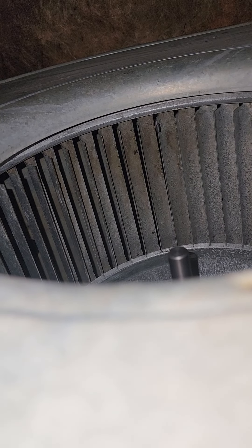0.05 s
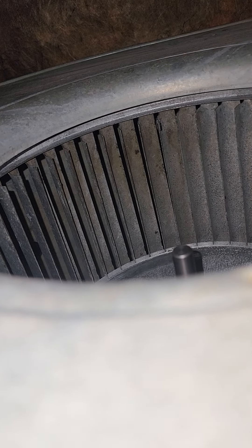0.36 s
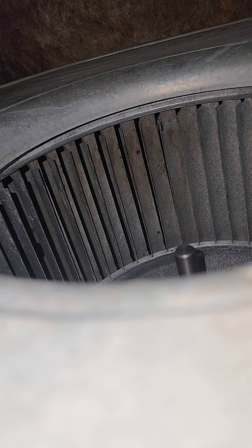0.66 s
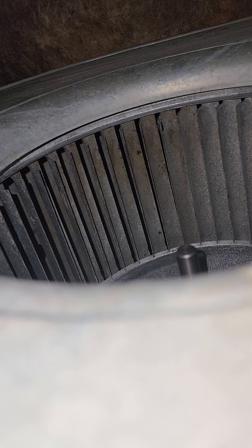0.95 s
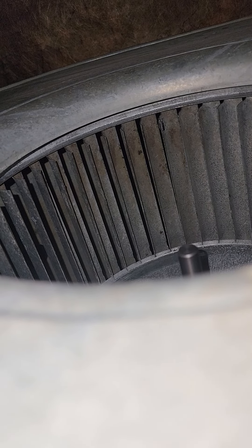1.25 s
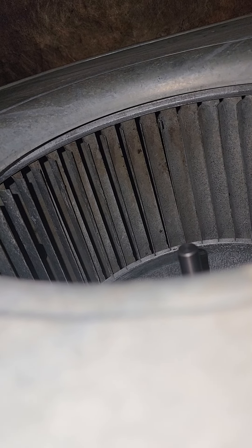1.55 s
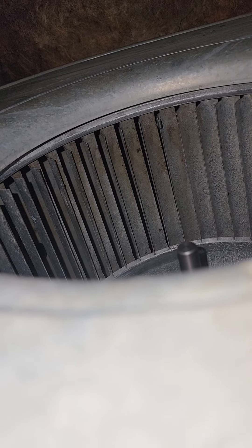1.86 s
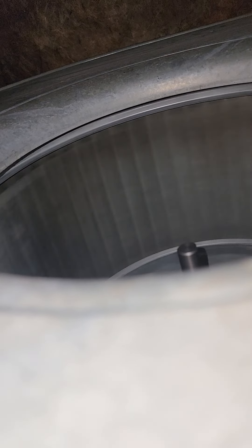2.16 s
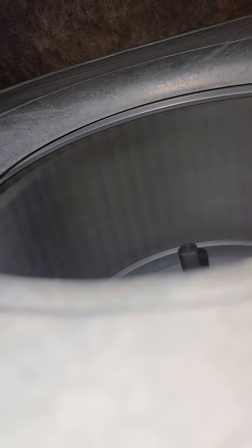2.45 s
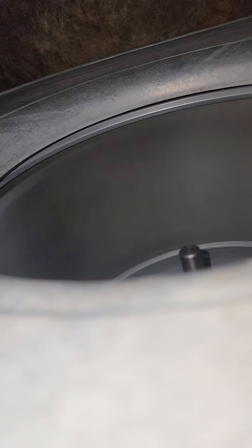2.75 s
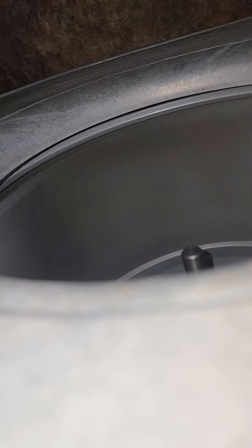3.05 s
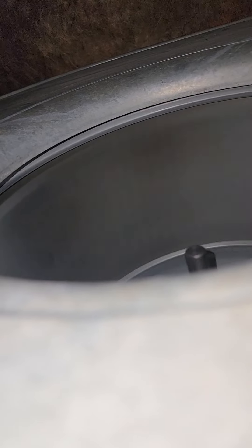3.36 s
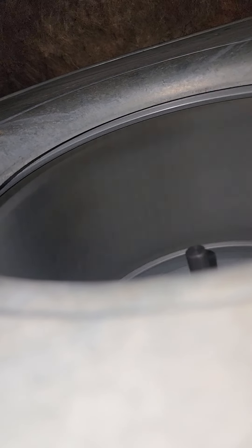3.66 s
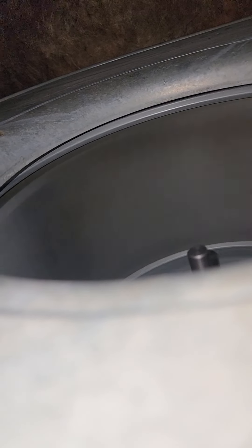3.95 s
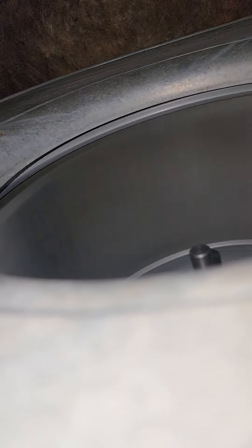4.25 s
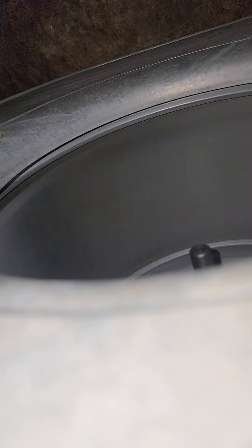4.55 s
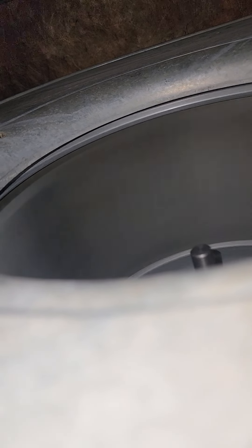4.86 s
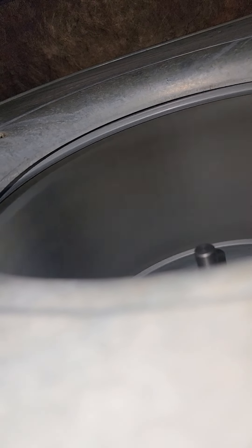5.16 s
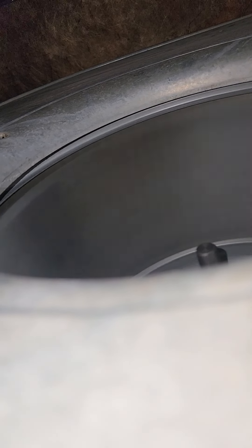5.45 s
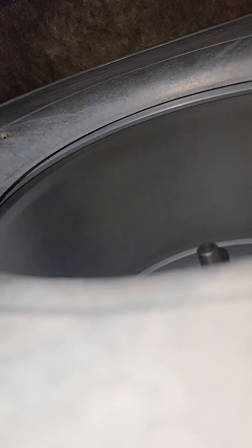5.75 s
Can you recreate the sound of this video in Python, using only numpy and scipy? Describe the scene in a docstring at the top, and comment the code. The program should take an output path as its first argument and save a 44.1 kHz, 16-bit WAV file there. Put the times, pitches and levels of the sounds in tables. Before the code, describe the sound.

Two sharp clicks and a metal clunk start a blower fan, which growls up to speed and runs with rushing air and buzzing panels.

```python
"""Air-conditioner blower starting up.

Close to the intake of a squirrel-cage blower, after faint taps and rustles, a switch snaps twice.
The induction motor jolts the sheet-metal casing and growls while the wheel gathers speed. Air rushes
in; at full speed the casing hums and buzzes with the mains, throbbing and chirping once a turn."""
import sys
import numpy as np
from scipy import signal
from scipy.fft import rfft, irfft
from scipy.io import wavfile

SR = 44100
rng = np.random.default_rng(int(sys.argv[2]) if len(sys.argv) > 2 else 0)


def inscribe(sig):
    """Save sig as 16-bit PCM at rate SR to the path in sys.argv[1].

    A 1-D sig is mono; a 2-D sig holds one channel per row.
    Samples are clipped to [-1, 1] before scaling.
    """
    pcm = np.round(np.clip(np.atleast_2d(sig).T, -1, 1) * 32767)
    wavfile.write(sys.argv[1], SR, pcm.astype(np.int16))


N = 255780
TIME = np.arange(N) / SR
BINS_HZ = np.fft.rfftfreq(N, 1 / SR)
PULL_HZ = 120  # magnetic pull, twice per mains cycle
START_S, CATCH_S, LOCK_S = 2.109, 3.32, 3.43  # current on, casing starts to buzz, rotor settles
RUB_LEAD_TURNS = .58  # rubbing ahead of the throb


def amp(db):
    """Decibels to gain."""
    return 10 ** (np.asarray(db) / 20)

def unit(x):
    """Scale to unit rms."""
    return x / np.sqrt(np.mean(x ** 2) + 1e-20)

def curve(points, hz):
    """Interpolate on a log-frequency axis."""
    f, value = np.transpose(points)
    return np.interp(np.log(hz + 1), np.log(f + 1), value)

def pan(side_db):
    """Stereo gains for a left-right level difference."""
    return amp(np.array([[1], [-1]]) * side_db / 2)

def drift(rate_hz):
    """Smooth random wander, unit rms."""
    coarse = TIME[::20]
    hz = np.fft.rfftfreq(len(coarse), coarse[1])
    spectrum = rfft(rng.standard_normal(len(coarse))) * np.exp(-(hz / rate_hz) ** 2)
    return np.interp(TIME, coarse, unit(irfft(spectrum, len(coarse))))

def white_pair(likeness):
    """Spectra of two white noises with the given correlation."""
    a, b = rfft(rng.standard_normal((2, N)))
    return np.array([a, likeness * a + np.sqrt(1 - likeness ** 2) * b])

# Stereo coherence: f/Hz, correlation/1
COHERENCE = [(60, .96), (250, .92), (700, .9), (1000, .78), (1600, .35), (2500, .1), (15000, .05)]
def noise(gain):
    """Shaped stereo noise, unit rms: alike in the bass, unrelated in the treble."""
    return unit(irfft(white_pair(curve(COHERENCE, BINS_HZ)) * gain, N))

def resonance(hz, width_hz):
    """Steep-sided frequency response of one mode."""
    return 1 / (1 + 1j * (BINS_HZ - hz) / (0.8 * width_hz)) ** 2

def pulses(cycles, sharpness):
    """Smooth gate peaking at each whole cycle, unit rms."""
    return unit(np.exp(sharpness * np.cos(2 * np.pi * cycles)))

def tone(cycles):
    """Sinusoid, unit rms."""
    return np.sqrt(2) * np.cos(2 * np.pi * cycles)

def struck(at_s, t60_s, rise_s):
    """Envelope of a strike."""
    age = np.maximum(TIME - at_s, 0)
    return (1 - np.exp(-age / rise_s)) * amp(-60 * age / t60_s)

def bell(at_s, half_s):
    """Gaussian swell, unit height."""
    return np.exp(-((TIME - at_s) / half_s) ** 2)

def onset(at_s, rise_s):
    """Smooth step from 0 to 1."""
    return .5 + .5 * np.tanh((TIME - at_s) / rise_s)


# Background spectrum: f/Hz, density/dB
ROOM_SPECTRUM = [(20, -5), (60, 2), (125, -1.5), (190, -5), (320, -7), (520, -17.5), (720, -15),
                 (1000, -23.5), (2000, -26), (3500, -34), (5300, -43), (7700, -39.5), (9600, -60),
                 (16000, -62)]
# Background balance: f/Hz, left-right/dB
ROOM_BALANCE = [(60, 1), (200, 2.5), (400, 9.5), (1300, 5.5), (4400, -12.5), (8000, -12.5), (15000, 6)]
def room():
    """Steady background with faint machine tones."""
    wash = noise(amp(curve(ROOM_SPECTRUM, BINS_HZ)) * pan(curve(ROOM_BALANCE, BINS_HZ)))
    wash *= amp(-37 + 0.3 * drift(2.7))
    tones = [(75.3, 7.4, -44), (117.8, 2.3, -46.5), (322.9, 5.4, -48.5), (830, 18, -54.5),
             (4340, 34, -70.5), (8350, 33, -74), (8750, 30, -80.5)]
    return wash + sum(amp(db) * noise(resonance(hz, width_hz)) for hz, width_hz, db in tones)

# Rustle spectrum: f/Hz, density/dB
RUSTLE_SPECTRUM = [(100, -21), (350, 7), (700, -6.5), (1500, -13.5), (3000, -21), (7000, -24.5),
                   (10000, -41), (15000, -43)]
# Rustles: t/s, level/dB, t60/s
RUSTLE_EVENTS = [(.1, -49, .2), (.28, -52, .35), (.44, -46, 0.4), (1.46, -36.5, 1.95), (1.83, -49, 0.24)]
def rustles(rise_s=0.037):
    """Soft rustles that swell quickly and die away."""
    level = sum(amp(db) * np.where(TIME < at_s, bell(at_s, rise_s), amp(-60 * (TIME - at_s) / t60_s))
                for at_s, db, t60_s in RUSTLE_EVENTS)
    return level * noise(amp(curve(RUSTLE_SPECTRUM, BINS_HZ))) * amp(0.87 * drift(60))

# Small close taps: t/s, level/dB, length/s, left-right/dB
TAP_EVENTS = [(0.27, -39, .00003, 4), (.585, -51, .00002, 2), (1.474, -29, .00007, 8),
              (1.817, -36, .00004, -10), (1.834, -19.5, 0.00043, -27.5)]
def taps():
    """Each tap is one push and pull of pressure."""
    out = np.zeros((2, N))
    for at_s, db, length_s, side_db in TAP_EVENTS:
        offset = (TIME - at_s) / length_s
        out -= amp(db) * pan(side_db) * np.tanh(5 * offset) * np.exp(-abs(offset))
    return out

# Switch snaps: t/s, level/dB, left-right/dB, spring level/dB
SNAP_EVENTS = [(2.0465, -21, -5, -33), (2.1015, -14.5, -5, -40)]
# Snap spectrum: f/Hz, density/dB
SNAP_SPECTRUM = [(300, -9), (2700, -25), (3550, -19), (4300, -11), (5300, -14.5), (6600, 0.5), (9000, -4),
                 (11000, -10), (15500, -11)]
# Snap decay: f/Hz, t60/s
SNAP_DECAY = [(1000, 0.1), (3600, 0.057), (5000, 0.054), (9000, 0.028), (15000, 0.04)]
def switch():
    """A spring contact snaps twice, each band dying at its own rate, with a thin ring and faint echo."""
    out = np.zeros((2, N))
    for at_s, db, side_db, spring_db in SNAP_EVENTS:
        crack = noise(amp(curve(SNAP_SPECTRUM, BINS_HZ)))
        hz, frame_s, bands = signal.stft(crack, SR, nperseg=128)
        decay = amp(-60 * np.maximum(frame_s - at_s, 0) / curve(SNAP_DECAY, hz)[:, None])
        attack = np.clip((TIME - at_s) / 0.00057, 0, 1)
        snap = signal.istft(bands * decay, SR, nperseg=128)[1][:, :N] * attack
        spring = amp(spring_db) * noise(resonance(3620, 380)) * struck(at_s, 0.14, 0.0014)
        echo = amp(-32) * crack * struck(at_s, 0.53, .008)
        out += spring + amp(db) * (snap * pan(side_db) + echo)
    return out

# Casing modes: f/Hz, level/dB, t60/s
CASING_MODES = [(38.8, -33, 1.6), (170.4, -19.5, 1.8), (318, -18, 0.47), (437, -28, 0.44), (493, -31, 0.19),
                (938, -17, 0.076), (980, -22.5, 0.42), (1440, -39, 0.2), (1860, -25.5, 0.063)]
def jolt(waver_cycles=.06):
    """Starting torque kicks the loose sheet-metal casing: it rings, clatters and rocks on its mounts."""
    ring = 0
    for hz, db, t60_s in CASING_MODES:
        level = amp(db + 1.5 * drift(30)) * struck(START_S, t60_s, 0.002)
        ring += level * np.sin(2 * np.pi * (hz * TIME + rng.random() + waver_cycles * drift(25)))
    spectrum_hz_db = [(100, -26), (280, 7.5), (700, -8), (1000, -20.5), (1400, -13), (2000, -13),
                      (3000, -29), (4500, -21.5), (8000, -52), (15000, -54)]
    clatter = amp(-20) * noise(amp(curve(spectrum_hz_db, BINS_HZ)))
    clatter *= struck(START_S, 0.3, 0.002) * pulses(PULL_HZ * TIME, 0.27)
    rumble = amp(-28) * noise(resonance(50, 60)) * struck(START_S, 7.4, 0.017)
    return (ring + clatter) * pan(10.3) + rumble

def brushes(turns, first_s=2.481, last_s=2.9, per_turn=6, growth_db_per_s=20):
    """The wheel brushes a panel ever faster and harder; returns rows of t/s, level/dB."""
    passes = np.floor(per_turn * (turns - np.interp(first_s, TIME, turns)))
    hits_s = TIME[1:][(np.diff(passes) > 0) & (passes[1:] >= 0) & (TIME[1:] < last_s)]
    uneven_db = 2 * np.interp(hits_s, TIME, drift(40))
    return list(zip(hits_s, -41 + growth_db_per_s * (hits_s - first_s) + uneven_db))

# Loose-panel knocks: t/s, level/dB
PANEL_KNOCKS = [(2.168, -29), (3.022, -29), (3.1, -31), (3.242, -26)]
def run_up_rattle(speed, turns, tick_hz=1950):
    """While the rotor slips, the casing shudders and a panel ticks."""
    slip = (1 - speed) * (TIME > WHEEL_SPEED[0][0])
    shudder = amp(-31) * noise(resonance(280, 130)) + amp(-48) * noise(resonance(970, 45))
    knocks = sum(amp(db) * struck(at_s, .04, .001) for at_s, db in list(PANEL_KNOCKS) + brushes(turns))
    return slip * shudder + knocks * tone(tick_hz * TIME + .18 * drift(200))

def grit(turns, buzz_gain, rate_per_s=60, decay_s=.0035):
    """Rubbing metal catches at random and gives tiny bright ticks."""
    chance = rate_per_s / SR * pulses(turns + RUB_LEAD_TURNS, 1) * buzz_gain ** 2 * (TIME > CATCH_S)
    catches = (rng.random(N) < chance) * amp(2.6 * np.minimum(rng.exponential(1, N), 2))
    envelope = unit(signal.lfilter([1], [1, -np.exp(-1 / (decay_s * SR))], catches))
    spectrum_hz_db = [(1500, -27), (3000, -12), (4400, 7), (5400, 5.5), (6700, 6), (9500, -9),
                      (12000, -11.5), (16000, -7)]
    return amp(-45.5) * envelope * noise(amp(curve(spectrum_hz_db, BINS_HZ)))

def chirps(speed, turns, buzz_gain, squeak_hz=6560, wander_hz=65):
    """Metal rubs and squeaks once a turn, varying in pitch and strength."""
    cycles = np.cumsum(squeak_hz + wander_hz * drift(29.3)) / SR
    rub = pulses(turns + RUB_LEAD_TURNS, 1.8) * pulses(PULL_HZ * TIME + turns, .6)
    rub = unit(rub * amp(2.4 * drift(7)))
    squeak = np.array([tone(cycles + .15 * drift(170)) for _ in range(2)])
    contact = buzz_gain * np.minimum(buzz_gain, 1) * speed ** 4
    return amp(-35.6) * contact * rub * squeak * pan(-8.5)

# Panel modes: f/Hz, width/Hz, level/dB, left-right/dB, stereo correlation/1
PANEL_MODES = [(495, 220, -29.5, 0, 1), (842, 73, -36, -7.5, 0.99), (984.4, 46, -35, 2.5, 1),
               (1071.6, 25, -35, 0.5, 0.89), (1413, 145, -37, 0, 0.93), (1866, 68, -35, 4, 0.92),
               (4367, 260, -37, -3, 0), (6510, 500, -36.5, -6, 0.2), (12200, 1600, -56.5, 1, 0.2)]
def panel_buzz(turns, buzz_gain):
    """Loose panels chatter at every magnetic pull, hardest once a turn."""
    chatter = buzz_gain * pulses(PULL_HZ * TIME, 0.28)
    flex = chatter * pulses(turns + 0.27, 0.14)
    rub = unit(pulses(turns + RUB_LEAD_TURNS, 0.1) * amp(4 * drift(75)))
    scrape = chatter * np.minimum(buzz_gain, 1) * rub  # high modes need hard contact
    out = np.zeros((2, N))
    for hz, width_hz, db, side_db, likeness in PANEL_MODES:
        ring = unit(irfft(white_pair(likeness) * resonance(hz, width_hz), N))
        out += amp(db) * pan(side_db) * ring * (scrape if hz > 3000 else flex)
    return out

def rush_level(speed, peak_gain, knee=0.67, settle_s=0.14):
    """Heard level of the rush: swells with speed, peaks, then settles slightly lower."""
    pole = np.exp(-1 / (settle_s * SR))
    peak_db = peak_gain * signal.lfilter([1 - pole], [1, -pole], np.gradient(speed, TIME))
    return amp(-25 + peak_db) * speed ** 4 / (speed ** 4 + knee ** 4)

# Turbulence spectrum: f/Hz, density/dB
AIR_SPECTRUM = [(25, -27), (60, -7), (150, 3.5), (300, -2), (600, -5.5), (780, -10.5), (1250, -9.5),
                (1650, -9.5), (2100, -6), (2700, -14), (3800, -11.5), (5500, -19.5), (7000, -13.5),
                (8300, -22), (9600, -35.5), (12000, -27), (15500, -39.5)]
# Turbulence balance: f/Hz, left-right/dB
AIR_BALANCE = [(100, 9), (1000, -0.5), (2700, 4.5), (4200, -2.5), (6500, -2), (8000, 4.5), (9000, 18.5),
               (11700, 3), (14000, 16)]
def air(speed, turns, split_hz=2200):
    """Blade turbulence, gusty during the run-up, brighter with speed."""
    rush = noise(amp(curve(AIR_SPECTRUM, BINS_HZ)) * pan(curve(AIR_BALANCE, BINS_HZ)))
    roar = irfft(rfft(rush) / (1 + (BINS_HZ / split_hz) ** 4), N)
    hiss = (rush - roar) * amp(20 * (speed - 1)) * pulses(turns + RUB_LEAD_TURNS, 0.034)
    gusts = amp(0.9 * drift(19) + 2.5 * (1 - speed) * drift(18))
    return (roar * rush_level(speed, peak_gain=4) + hiss * rush_level(speed, peak_gain=8)) * gusts

def buzz_level():
    """Buzz level: kick, faint tremor, then full buzz that peaks and briefly dips."""
    kick = amp(-10) * struck(START_S, 0.77, .004)
    running = onset(CATCH_S, .016)
    tremor = amp(-21) * onset(2.51, 0.09) * (TIME > START_S) * (1 - running)
    peak_db, dip_db = 3 * bell(3.39, 0.042), 4 * bell(3.5, 0.042)
    return kick + tremor + running * amp(-0.98 + peak_db - dip_db)

def whine(skew_cycles, top_hz=445, top_s=3.13, bend_hz_per_s2=2400):
    """Brief whine that arches in pitch as the rotor catches up with the field."""
    hz = np.maximum(top_hz - bend_hz_per_s2 * (TIME - top_s) ** 2, 2 * PULL_HZ)
    level = amp(-34 + 5.5 * drift(19)) * bell(3.15, 0.16)
    return level * tone(np.cumsum(hz) / SR + .11 * drift(40) + skew_cycles)

def running_hum(hunt_hz=2.46, sag_db_per_s=1.37):
    """Hum level at full speed: builds, swings as the rotor hunts, slowly eases."""
    age = np.maximum(TIME - LOCK_S, 0)
    hunt_db = 1.5 * np.exp(-age / 1.9) * np.cos(2 * np.pi * hunt_hz * age)
    drop_db = sag_db_per_s * age + 4 * np.exp(-age / 0.22)
    return onset(LOCK_S, 0.074) * amp(-15.5 + hunt_db - drop_db)

# Motor surges: t/s, half-length/s, hum level/dB, growl level/dB
MOTOR_SURGES = [(2.147, 0.022, -12, -28), (2.223, 0.088, -31, -35), (2.437, 0.072, -20.5, -29),
                (2.557, 0.017, -23.5, -30), (2.641, .04, -17.5, -21.5), (2.757, 0.036, -21.5, -20),
                (2.924, .03, -27, -27.5), (3.17, .025, -24.5, -48), (3.427, 0.024, -9, -32.5),
                (3.597, 0.0089, -13.5, -49), (3.876, 0.058, -19, -51)]
# Magnetic lines: harmonic/pull rate, sideband/shaft rate, level/dB
MOTOR_LINES = [(1, 1, -35), (1, 2, -39), (2, 2, -40), (3, -2, -43), (3, -1, -42), (3, 0, -45), (3, 1, -31),
               (4, 0, -35), (4, 1, -34), (4, 2, -45), (5, -2, -40), (5, 0, -38), (5, 1, -39), (6, -2, -49),
               (6, 0, -47), (7, -1, -39), (7, 0, -47), (8, -2, -50), (8, -1, -47), (8, 1, -47), (8, 2, -43),
               (9, -1, -38), (9, 0, -42), (9, 1, -42), (10, 2, -52), (15, 0, -53), (15, 1, -47),
               (16, 1, -52)]
def motor(speed, turns, buzz_gain):
    """Magnetic hum and growl; the off-centre rotor adds a throb and sidebands at the shaft rate."""
    pull = PULL_HZ * TIME
    skew_cycles = 0.0099 * np.array([[-.5], [.5]])  # left-right phase offset
    depth = 0.41 * (1 + .3 * drift(6.1)) * speed ** 4
    throb = (1 + depth * np.cos(2 * np.pi * turns)) * amp(1.3 * drift(15))
    hum_surge = sum(amp(db) * bell(at_s, half_s) for at_s, half_s, db, _ in MOTOR_SURGES)
    growl_surge = sum(amp(db) * bell(at_s, half_s) for at_s, half_s, _, db in MOTOR_SURGES)
    hum = (throb * running_hum() + hum_surge) * tone(2 * pull + 0.035 * drift(37) + skew_cycles)
    growl = growl_surge * tone(pull + 0.14 * drift(9.7) + skew_cycles)
    phases = rng.random(32)  # shared by a harmonic's sidebands, so they swell with the throb
    lines = 0
    for harmonic, sideband, db in MOTOR_LINES:
        cycles = harmonic * pull + sideband * turns + phases[int(harmonic)] + 2 * skew_cycles
        lines += amp(db) * (1 + 0.46 * drift(11)) * tone(cycles)
    return hum + growl + whine(skew_cycles) + buzz_gain * speed ** 2 * lines * pan(0.72)

# Wheel run-up: t/s, speed/full speed
WHEEL_SPEED = [(2.11, 0), (2.5, .22), (2.9, .52), (3.2, .82), (3.36, .98), (3.45, 1)]
def scene(shaft_hz=19, narrowest_gap_s=3.595):
    """Wheel speed and angle drive the motor, casing and air."""
    speed = np.interp(TIME, *np.transpose(WHEEL_SPEED))
    turns = np.cumsum(shaft_hz * speed) / SR
    turns -= np.interp(narrowest_gap_s, TIME, turns)
    buzz_gain = buzz_level()
    casing = run_up_rattle(speed, turns) + panel_buzz(turns, buzz_gain)
    rubbing = chirps(speed, turns, buzz_gain) + grit(turns, buzz_gain)
    blower = motor(speed, turns, buzz_gain) + casing + rubbing + air(speed, turns) + jolt()
    return blower + switch() + taps() + room() + rustles()

def record(dry):
    """Low-pass at 15.9 kHz."""
    lowpass = signal.firwin(511, 15900, window=("kaiser", 9), fs=SR)
    return signal.oaconvolve(dry, lowpass[None], "same")


dry = scene()
out = record(dry)
inscribe(out)
```